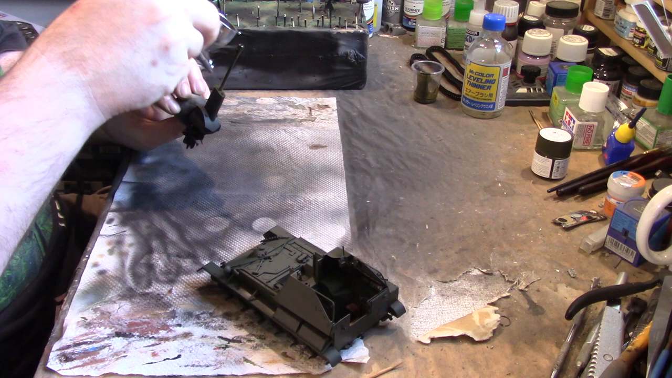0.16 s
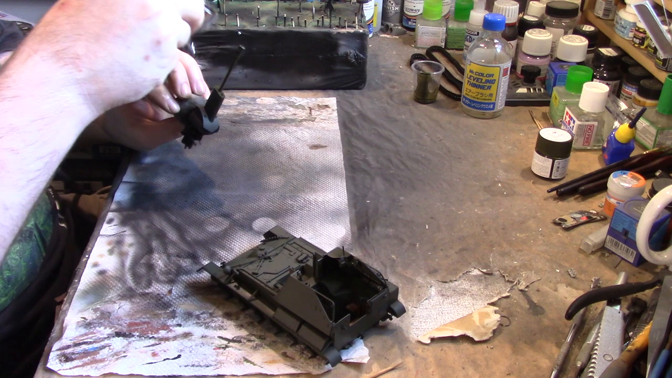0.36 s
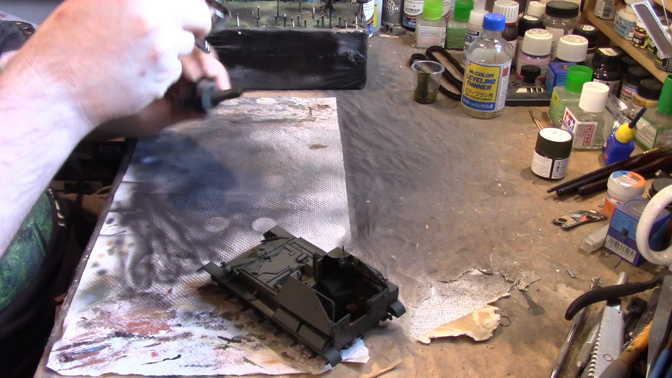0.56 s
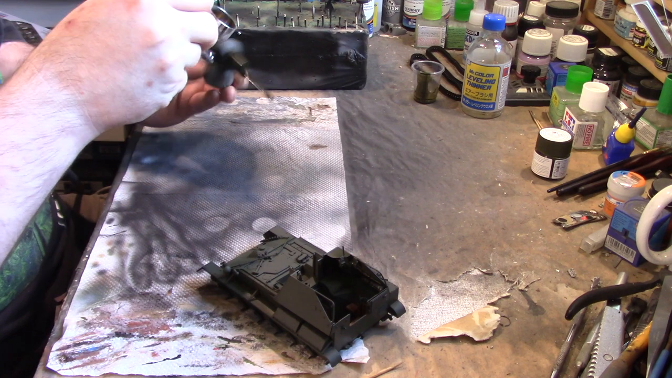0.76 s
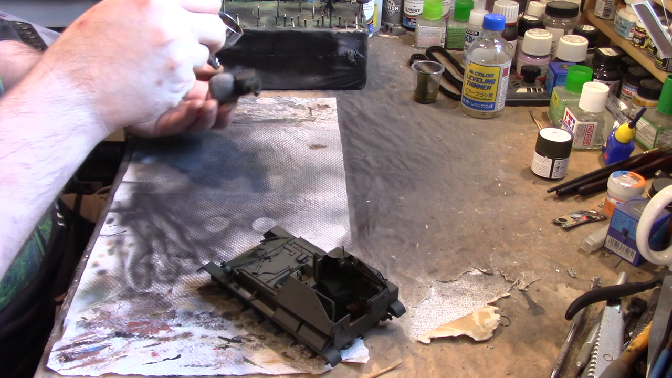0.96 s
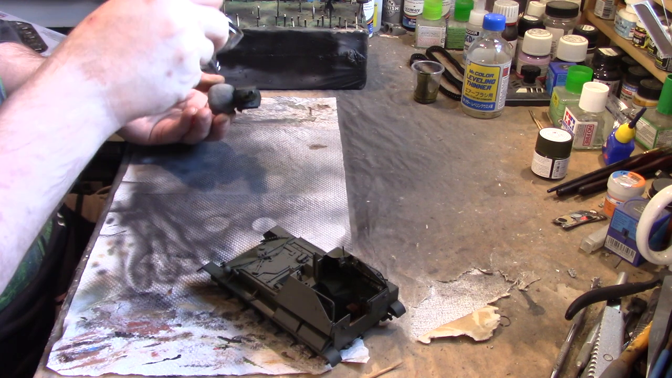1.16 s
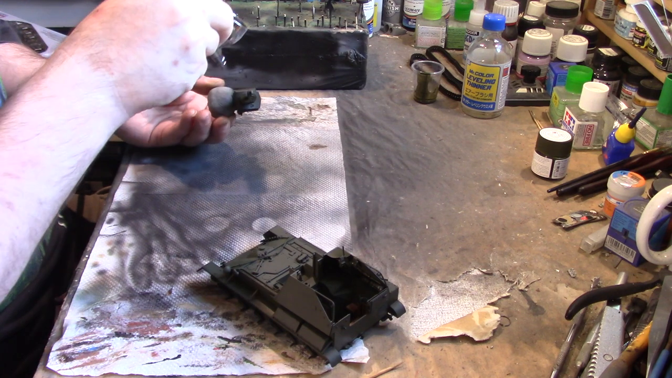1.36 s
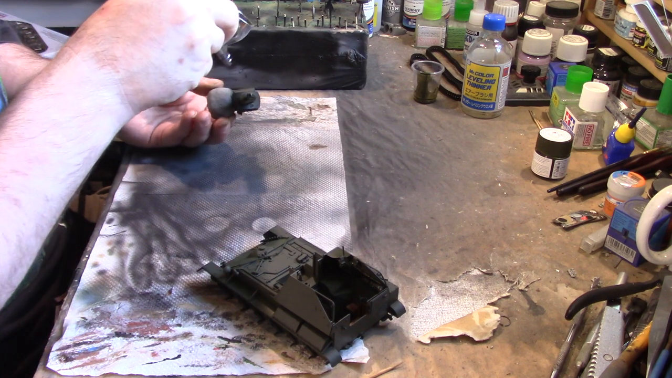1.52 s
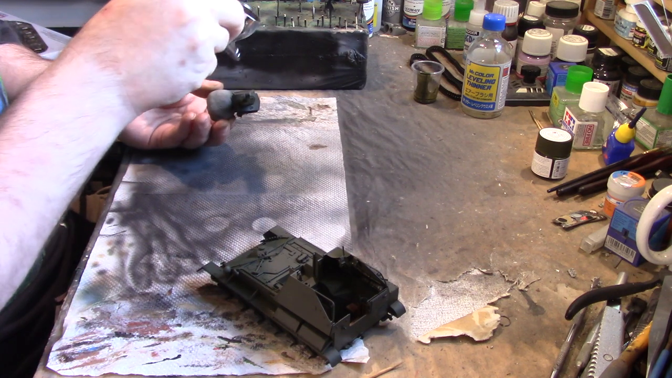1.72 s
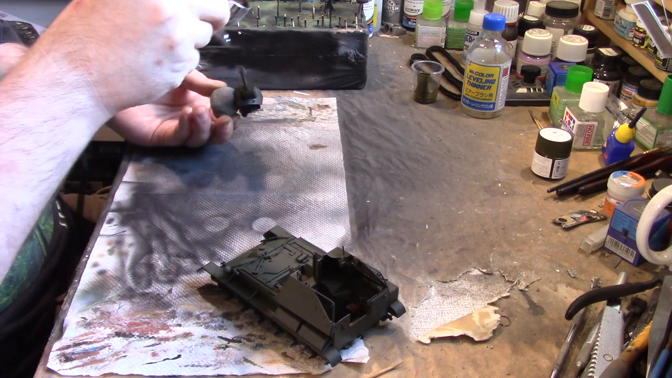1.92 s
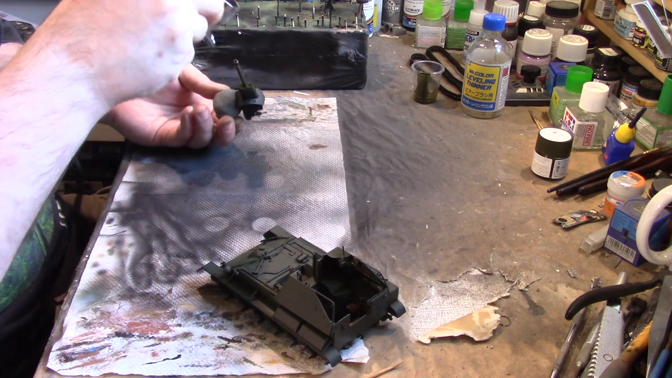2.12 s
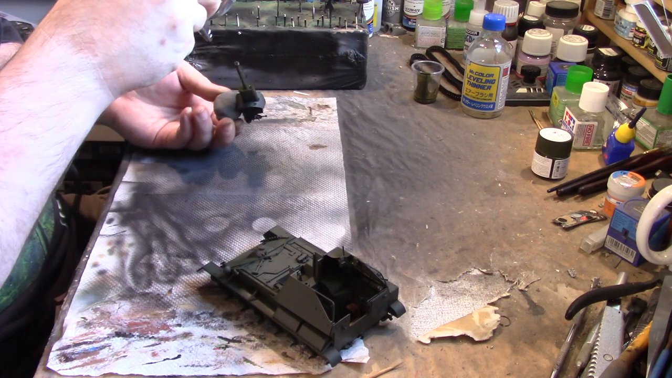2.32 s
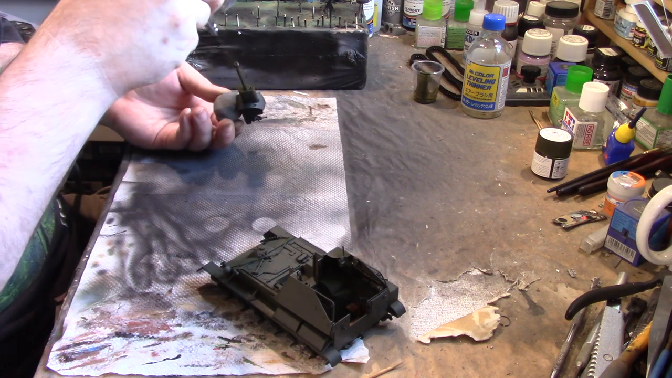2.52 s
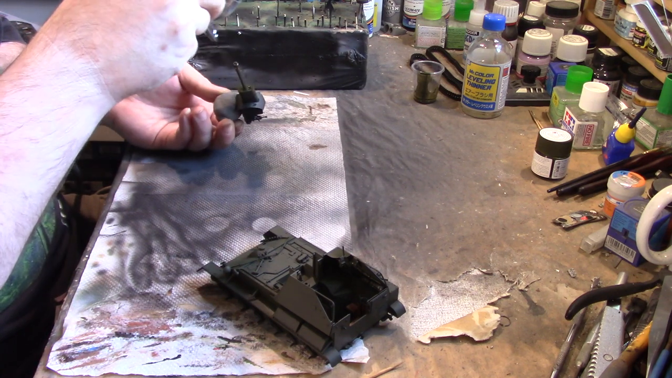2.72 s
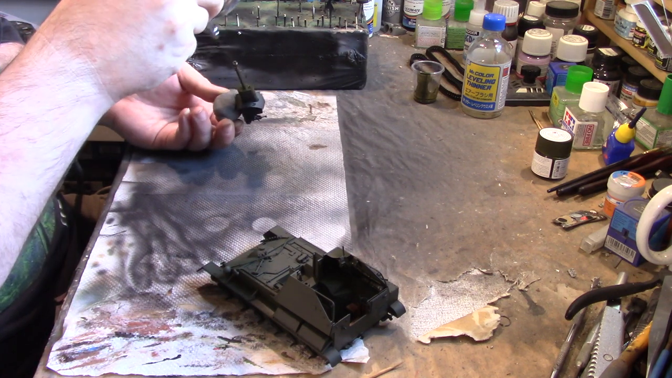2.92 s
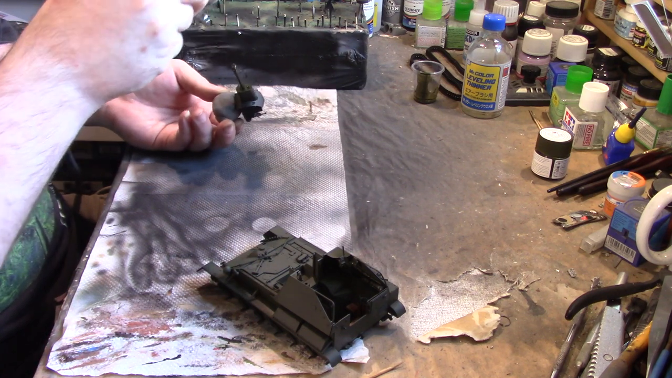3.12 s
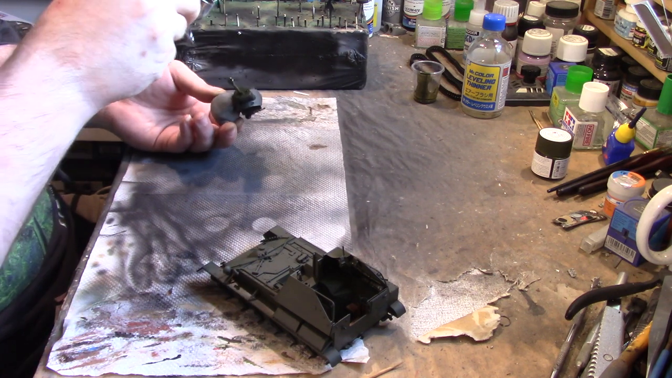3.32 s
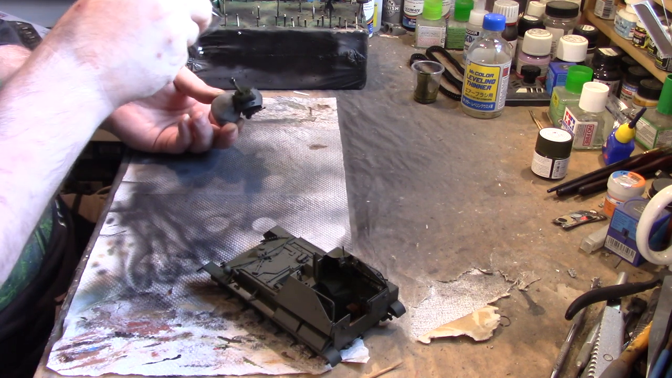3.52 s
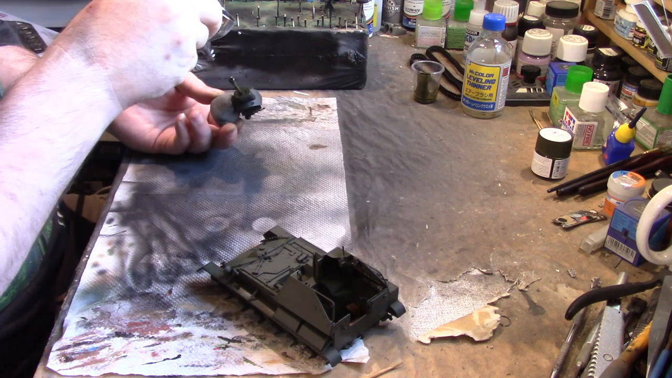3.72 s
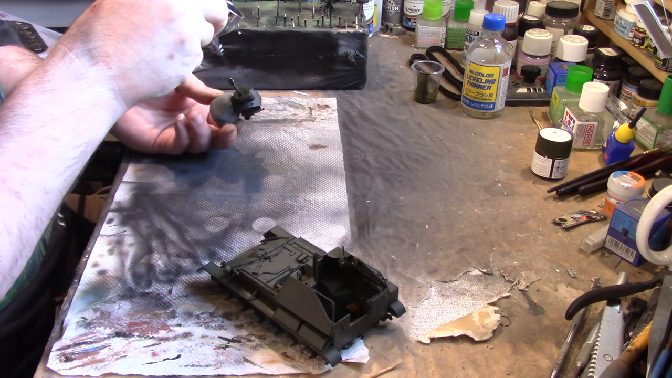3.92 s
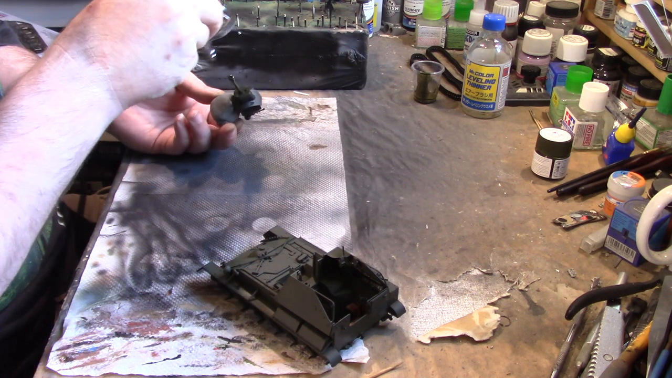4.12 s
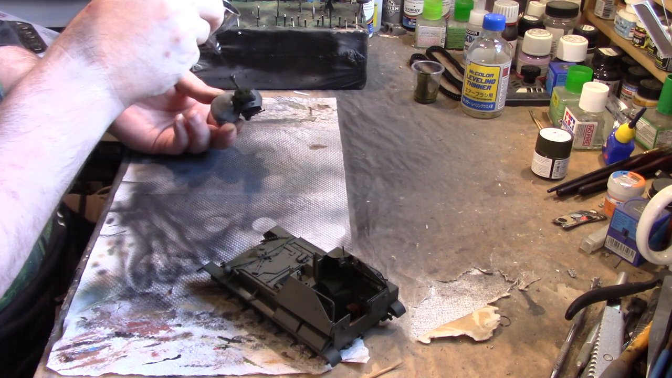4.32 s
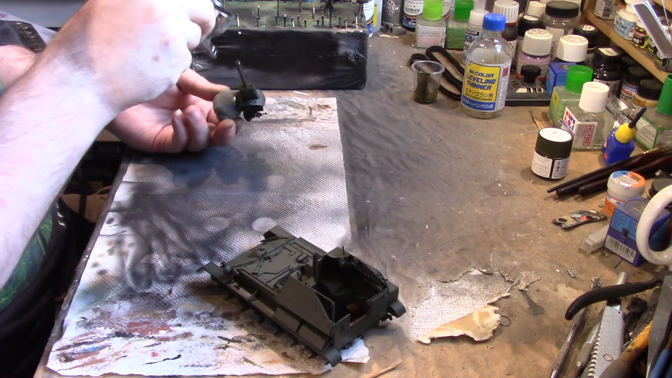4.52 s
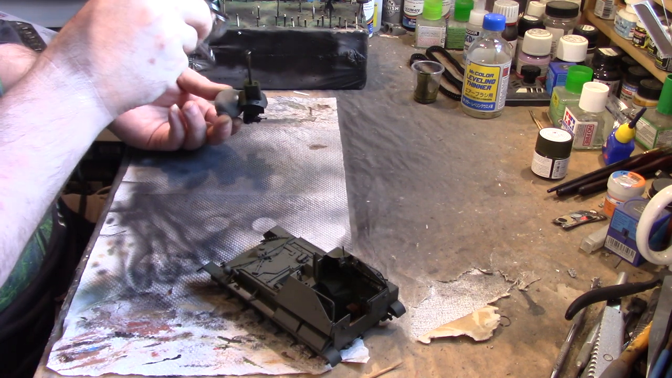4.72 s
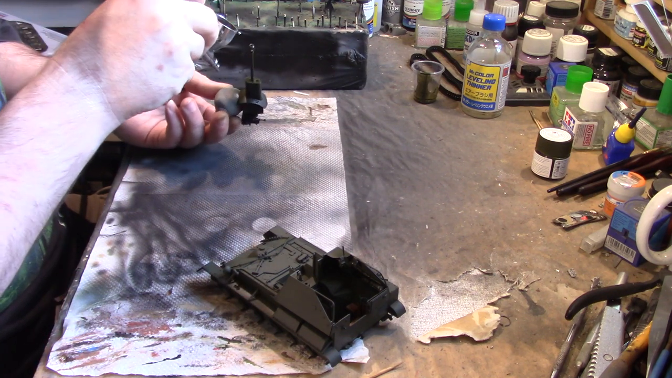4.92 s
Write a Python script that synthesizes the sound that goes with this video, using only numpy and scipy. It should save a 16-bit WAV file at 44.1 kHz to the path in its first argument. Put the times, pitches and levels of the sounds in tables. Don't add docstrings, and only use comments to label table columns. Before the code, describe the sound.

A close stereo pickup in a small, soft, quiet workroom. An airbrush is already spraying at the start, a bright dense hiss with breathy lower buffeting, and shuts at about 0.35 s. In the gap, a tiny motor gives thin, high, fading whines from 0.4 to 1.0 s; a light, crisp knock with a small rebound lands at 0.58 s, and cloth rustles near 0.87 s. The second pull opens at 1.1 s with thin air, swells to full by 1.5 and stops at 1.75, leaking faintly; tiny ticks follow. The third runs 2.07 to 3.0 s, followed by a weak leak, tick and soft rustle. The fourth, longest and fullest with hollow low-mid buffeting, runs 3.4 to 4.5 s. A sharper tick and rustle come around 4.6 s, then the last pull starts at 4.75 s and cuts off near 5.2 s. Soft low room rumble lies underneath, with short echoes.

```python
import sys
import numpy as np
from scipy import signal
from scipy.fft import rfft, irfft, next_fast_len
from scipy.io import wavfile
from scipy.ndimage import uniform_filter1d

SR = 44100
rng = np.random.default_rng(int(sys.argv[2]) if len(sys.argv) > 2 else 0)


def persist_wave(psi):
    counts = np.round(np.clip(psi, -1, 1) * 32767).astype(np.int16)
    wavfile.write(sys.argv[1], SR, np.atleast_2d(counts).T)


def boost(x):
    u = np.asarray(x, float) / 20
    return 10 ** u


N = 223229
TIME = np.arange(N) / SR
SIZE = next_fast_len(N + SR // 2)
FREQ = np.maximum(np.fft.rfftfreq(SIZE, 1 / SR), 1)


def unit(x):
    return x / np.sqrt(np.mean(x ** 2))


def shape_db(points):
    hz, db = np.transpose(points)
    return np.interp(np.log(FREQ), np.log(hz), db)


def bell(s, length):
    return np.exp(-4 * np.log(2) * ((TIME - s) / length) ** 2)


def humps_db(table):
    return sum(db * np.exp(-4 * np.log(2) * ((FREQ - hz) / width) ** 2) for hz, width, db in table)


def colour(x, db):
    return irfft(rfft(x, SIZE) * boost(db), SIZE)[..., :N]


def walk(rate):
    hold = max(int(SR / rate), 1)
    steps = np.repeat(rng.standard_normal(N // hold + 1), hold)
    slewed = uniform_filter1d(uniform_filter1d(steps, hold), hold)
    return unit(slewed[:N])


def widen(mid, other, side_db):
    side = colour(other, side_db)
    return np.array([mid + side, mid - side])


def eddies(colour_db, flutter_db, spit_db):
    air = rng.standard_normal(N) * boost(spit_db * walk(1500))
    return unit(unit(colour(air, colour_db)) * boost(flutter_db * walk(18)))


# (frequency [Hz], density [dB per Hz])
ROOM = [(25, -29), (64, -10.5), (100, -8), (150, -1.5), (490, -4), (2900, -15), (8000, -23), (16000, -34.5)]
# (centre [Hz], width [Hz], gain [dB])
HUM = [(72, 16, 4), (132, 10, 5), (155, 9, 8), (11070, 110, 10)]
# (frequency [Hz], side minus mid [dB])
ROOM_SIDE = [(60, -3), (110, -9), (380, -3.5), (1290, -9), (2380, -9.5), (8120, -12), (15000, -19)]
ROOM_DB = -55


def room():
    mid, swell, noise = 0, walk(1.18), rng.standard_normal((2, N))
    spectrum_db = shape_db(ROOM) + humps_db(HUM)
    for octave in range(-1, 9):
        band_db = -12 * (np.log2(FREQ / 62.5) - octave) ** 2
        level_db = 1.0 * swell + 0.6 * walk(3.6)
        mid = mid + colour(noise, spectrum_db + band_db) * boost(level_db)
    mid = mid * boost(ROOM_DB) / np.std(mid[0])
    return widen(mid[0], mid[1], shape_db(ROOM_SIDE))


# (start [s], length [s], level [dB])
WHINE = [
    (.4, .04, -71),
    (.515, .045, -69.5),
    (.68, .17, -70),
    (.85, .15, -77),
]
WHINE_HZ, WHINE_FADE_DB_PER_S = 5561, 29


def whine():
    gain = 0
    for s, length, db in WHINE:
        running = (TIME > s) * (TIME < s + length)
        gain = gain + running * boost(db - WHINE_FADE_DB_PER_S * np.clip(TIME - s, 0, 1))
    return np.sqrt(2) * uniform_filter1d(gain, size=400) * np.sin(2 * np.pi * WHINE_HZ * TIME)


# (time [s], length [s], level [dB])
RUSTLES = [
    (0.873, 0.085, -64),
    (3.176, 0.11, -68),
    (4.6, .08, -63),
]
# (frequency [Hz], density [dB per Hz])
CLOTH = [(150, -47), (500, 6), (1200, 12), (2200, -16), (2850, 0), (3600, -13), (9000, -32)]
RUSTLE_BED_DB = -83.5


def rustle():
    gain = boost(RUSTLE_BED_DB) + sum(boost(db) * bell(s, length) for s, length, db in RUSTLES)
    return gain * eddies(shape_db(CLOTH), flutter_db=5.5, spit_db=3.0)


# (time [s], crack peak [dB], thud level [dB], crack frequency [Hz])
TICKS = [
    (.5797, -25.5, -39.5, 7000),
    (.5965, -44, -55, 4200),
    (.632, -66, -53, 3000),
    (1.83, -52, -60, 9000),
    (1.925, -64, -59, 2500),
    (3.106, -49, -60, 5000),
    (4.585, -43, -53, 5000),
    (4.713, -58, -58, 8700),
]
# (frequency [Hz], level [dB])
THUD = [(100, -38), (220, -2), (500, 0), (900, -4), (2200, -11), (5000, -17), (8000, -21), (13000, -30)]
# (frequency [Hz], level [dB], decay time t60 [s])
BENCH = [(326, -3, .04), (520, -5, .05), (775, -4, .04), (1550, -8, .025), (2200, -2, .022),
         (2700, -9, .015)]


def ticks():
    out, t = np.zeros(N + SR), np.arange(SR // 5) / SR
    rattle = np.append(eddies(shape_db(THUD), flutter_db=.3, spit_db=1.5), np.zeros(SR))
    swing = sum(boost(db - 60 * t / t60) * np.sin(2 * np.pi * f * t) for f, db, t60 in BENCH)
    swing = swing * (1 - np.exp(-t / 0.0015))
    for s, crack_db, thud_db, hz in TICKS:
        at = slice(int(s * SR), int(s * SR) + len(t))
        crack = np.sin(2 * np.pi * hz * t) - .8 * np.sin(2 * np.pi * .62 * hz * t)
        out[at] += boost(crack_db + 2.5) * crack * boost(-60 * t * hz / 8)
        out[at] += boost(thud_db + 4.5) * swing
        out[at] += boost(thud_db + .6) * boost(-60 * t / 0.13) * rattle[at]
    return out[:N]


CRACK_S, CRACK_DB, AIR_ONLY_DB, WAIT_S = 0.01, -18.5, -7, 0.064
EASE_S, EASE_DB, SNAP_S, SNAP_DB, LEAK_S, LEAK_DB = 0.056, -6, 0.021, -22, 0.057, -44.5


def valve_db(opens, full, shuts, ease_share, leak_db, rise_s):
    risen = opens + rise_s
    snapped = shuts + SNAP_S
    leaked = snapped + LEAK_S
    s = [opens - CRACK_S, opens, risen, risen + WAIT_S, full,
         shuts - EASE_S, shuts, snapped, leaked, leaked + .15]
    db = [-42, CRACK_DB, AIR_ONLY_DB, AIR_ONLY_DB + 0.33, 0,
          0, EASE_DB * ease_share, SNAP_DB, LEAK_DB + leak_db, LEAK_DB + leak_db - 20]
    return np.interp(TIME, s, db, -200, -200)


# (frequency [Hz], density [dB per Hz])
HISS = [(2000, -72), (4500, -22), (6500, -1.5), (8500, 0.5), (11000, 2), (13500, 1.5), (15800, -3.5)]
SHEAR = [(1000, -70), (2300, -40), (3400, -1.5), (4700, -2), (6100, -1.5), (8000, -23)]
SCRUB = [(300, -58), (800, -2), (1200, -1), (2000, -0.5), (3200, -0.5), (4400, -19.5)]
BUFFET = [(50, -70), (120, -13.5), (190, -17.5), (260, -5.5), (550, 1), (950, -7.5), (1500, -18.5)]
# (centre [Hz], width [Hz], gain [dB])
PALM = [(246.5, 54, 7), (338, 19, 4.5), (378.5, 31, 7), (594, 130, 3), (756, 51, 8)]


def jet_parts():
    return np.array([eddies(shape_db(HISS), flutter_db=0.65, spit_db=0.5),
                     eddies(shape_db(SHEAR), flutter_db=0.3, spit_db=0.0),
                     eddies(shape_db(SCRUB), flutter_db=0.5, spit_db=1.0),
                     eddies(shape_db(BUFFET) + humps_db(PALM), flutter_db=0.5, spit_db=-0.8)])


# (time [s], length [s], shear gain [dB], scrub gain [dB], buffet gain [dB])
SWEEPS = [(0.057, .1, 4.5, 12, 9), (0.192, 0.19, -1.2, -3.5, -1.5), (0.307, 0.081, 2.5, 13, 10.5),
          (1.478, .3, 1, 8.5, 4.5), (1.582, 0.087, 0, 2, 3.5), (1.722, .06, 0.5, -5, -6),
          (2.2, 0.085, -1.5, 3.5, 4), (2.548, 0.099, 3, 4, 1), (2.84, 0.073, 1.5, 3.5, -1.5),
          (3.0, 0.041, 1.5, 2.5, 3), (3.45, 0.42, -1, 0.5, 6), (3.72, 0.31, 1.7, 0.6, 0),
          (4.16, 0.078, 0.5, -1.8, 4), (4.565, .06, 5, 8, 7), (4.788, 0.091, 0.8, 2.2, 6),
          (5.002, 0.13, 0.5, 4, 4.5)]


def sweep_gains_db():
    return sum(np.outer(gain_db, bell(s, length)) for s, length, *gain_db in SWEEPS)


RIPPLE_DEPTH = 1.22


def pose_colour(jet, pose, shift, depth, bright_db):
    humps = humps_db([(hz * (1 + shift), width, db) for hz, width, db in pose])
    top = np.clip(np.log2(FREQ / 8000) * 2, 0, 1)
    return colour(jet, RIPPLE_DEPTH * depth * humps + bright_db * top)


# (valve opens [s], paint at full flow [s], valve shuts [s], hiss level [dB], palm nearness [dB])
PULLS = [
    (-.4, -.02, 0.34, -28.5, -2),
    (1.111, 1.485, 1.753, -30, 0),
    (2.069, 2.415, 3.01, -29.5, 1),
    (3.393, 3.702, 4.516, -28.5, 7.5),
    (4.755, 5, 5.193, -28.5, 2),
]
# (top octave [dB], drift of the humps as the part turns [%],
# depth of the humps at first [0-1], leak after shutting [dB], rush of the first air [s])
AIMS = [
    (.5, .3, 1.1, -5, .024),
    (.7, .3, 1, 8, 0.031),
    (0, -1.1, 0.8, 11.5, 0.021),
    (0, -0.16, 1, -4, 0.019),
    (0, .1, 0.65, 0, 0.022),
]
# (centre [Hz], width [Hz], gain [dB])
POSE_1 = [(1160, 200, 3.5), (2970, 1100, 3.5), (3230, 170, -6.5), (4660, 370, 2), (5300, 450, -2),
          (6100, 160, 2), (6540, 500, -2.5), (8100, 250, 0.5), (8500, 200, -3), (10000, 600, 1.5)]
POSE_2 = [(2900, 520, 1.5), (3640, 190, 2), (4930, 150, 2.5), (5470, 600, -3), (6100, 200, 3.5),
          (6900, 170, 2.5), (8150, 420, 3), (9300, 600, -1), (10050, 250, 4), (11400, 170, 3),
          (14100, 170, -3)]
POSE_3 = [(2730, 580, 4), (4000, 140, -1), (4430, 200, 5.5), (6660, 400, -3.5), (7850, 400, -2.5),
          (8730, 220, 5), (10860, 170, 4), (11500, 170, 4), (12100, 250, 2.1), (12700, 300, -3),
          (13740, 550, 2)]
POSE_4 = [(1443, 170, 5), (1910, 280, -3.5), (3290, 210, -5), (3870, 1050, 2), (6440, 320, 1.5),
          (9300, 370, -3), (10140, 290, 5), (11090, 170, 0), (12120, 250, 4.5), (13300, 600, -3),
          (14810, 370, 1)]
POSE_5 = [(1390, 190, 3.5), (6030, 110, 4), (7410, 800, -2.5), (8800, 800, 3.5), (9600, 250, 0),
          (11200, 170, 4), (12000, 250, 4), (12830, 110, 3.4), (13260, 370, -3.4)]
ON_PART_DB, EASE_SHARE, LAG_S = (-10.5, -16, -19), (0.76, 0.12, .1), (0.0051, 0.0057, 0.011)
LINGER_S = 0.0075
PALM_SHARE = 0.63


def spray():
    parts = jet_parts()
    shear_db, scrub_db, buffet_db = sweep_gains_db()
    out = np.zeros(N)
    poses = [POSE_1, POSE_2, POSE_3, POSE_4, POSE_5]
    for (opens, full, shuts, hiss_db, palm_db), pose, aim in zip(PULLS, poses, AIMS):
        bright_db, drift, depth, *valve = aim
        flow_db = valve_db(opens, full, shuts, 0.98, *valve)
        contact_db = [shear_db, scrub_db + PALM_SHARE * palm_db, buffet_db + palm_db]
        on_part = [valve_db(opens + lag_s, full, shuts + LINGER_S, share, *valve) + db + more
                   for db, share, more, lag_s in zip(ON_PART_DB, EASE_SHARE, contact_db, LAG_S)]
        jet = np.sum(boost(hiss_db + np.array([flow_db, *on_part])) * parts, axis=0)
        aimed = np.clip(1.76 + flow_db / 9 + 0.21 * walk(10), 0, 1)
        out += jet * (1 - aimed)
        heard_from = max(opens, 0)
        turned = np.clip(3 * (TIME - heard_from) / (shuts - heard_from) - .9, 0, 1)
        out += pose_colour(jet * aimed * (1 - turned), pose, -drift / 200, depth, bright_db)
        out += pose_colour(jet * aimed * turned, pose, drift / 200, 1, bright_db)
    return out


ECHO_T60_S = 0.12
LATE_T60_S, LATE_DB, LATE_TOP_HZ = 0.43, -15.5, 7000


def echoes(x):
    t = np.arange(SR // 2) / SR
    early, late = rng.standard_normal((2, 2, len(t)))
    late = signal.sosfilt(signal.butter(2, LATE_TOP_HZ, fs=SR, output="sos"), late)
    early = early * boost(-60 * t / ECHO_T60_S)
    late = late * boost(LATE_DB - 60 * t / LATE_T60_S)
    tail = (early + late) * (t > .004)
    tail = tail / np.sqrt(np.sum(tail ** 2, axis=1, keepdims=True))
    return irfft(rfft(x, SIZE) * rfft(tail, SIZE), SIZE)[:, :N]


# (frequency [Hz], side minus mid [dB])
JET_SIDE = [(300, -57), (2000, -29.5), (5000, -21), (9000, -20.5), (12500, -17), (15500, -18)]
ECHO_DB = -12


def scene():
    near = spray() + ticks() + rustle()
    wet, other = echoes(near)
    return widen(near + boost(ECHO_DB) * wet, other, shape_db(JET_SIDE)) + room() + whine()


def top_cut(x):
    return signal.sosfilt(signal.butter(12, 17010, fs=SR, output="sos"), x)


# (frequency [Hz], left minus right [dB])
LEFT_DB = [(4000, 0), (9000, .3), (15000, .4)]
TOP_HZ = 15650


def record(dry):
    top_db = -np.clip((FREQ - TOP_HZ) / 200, 0, 2) ** 2 * 20
    balance_db = np.outer([.5, -.5], shape_db(LEFT_DB))
    return top_cut(colour(dry, top_db + balance_db))


dry = scene()
out = record(dry)
persist_wave(out)
```